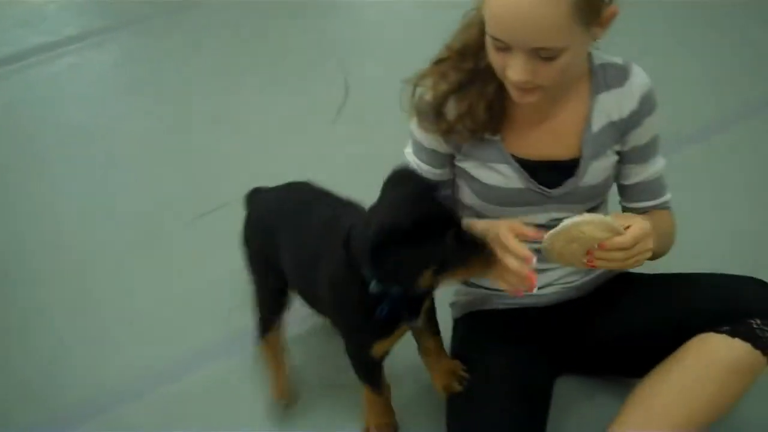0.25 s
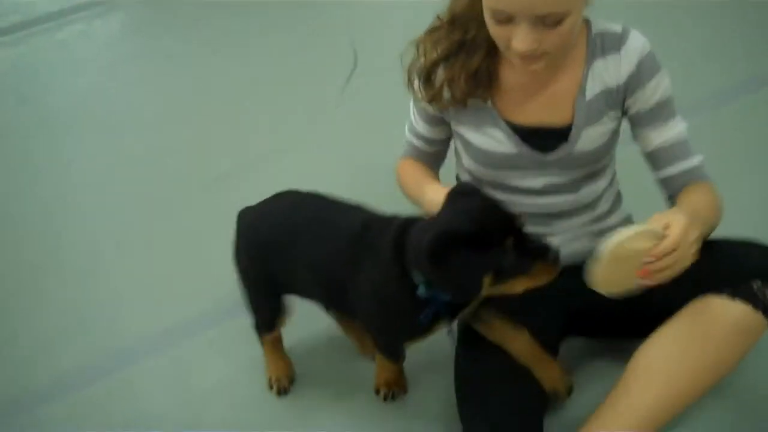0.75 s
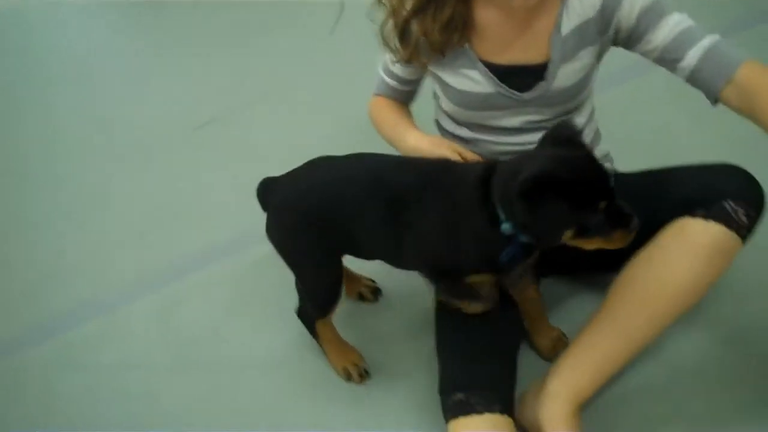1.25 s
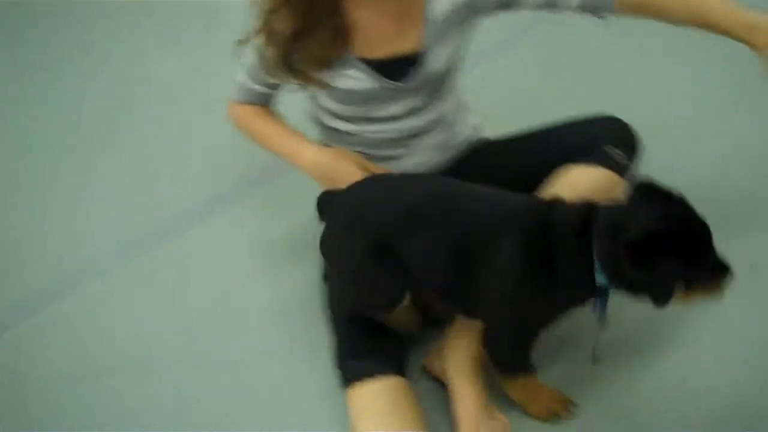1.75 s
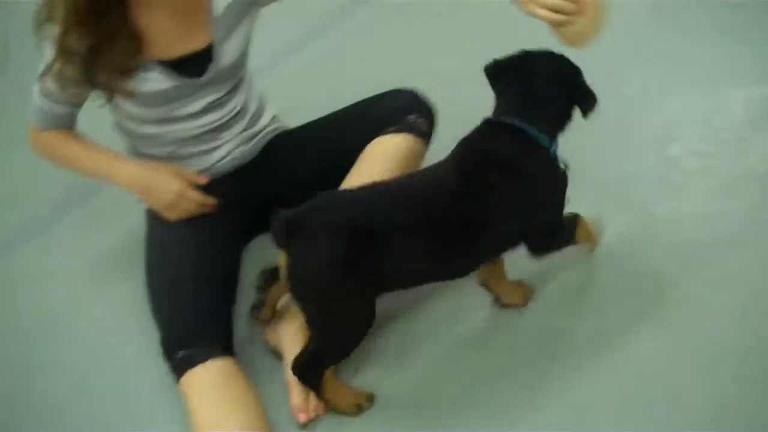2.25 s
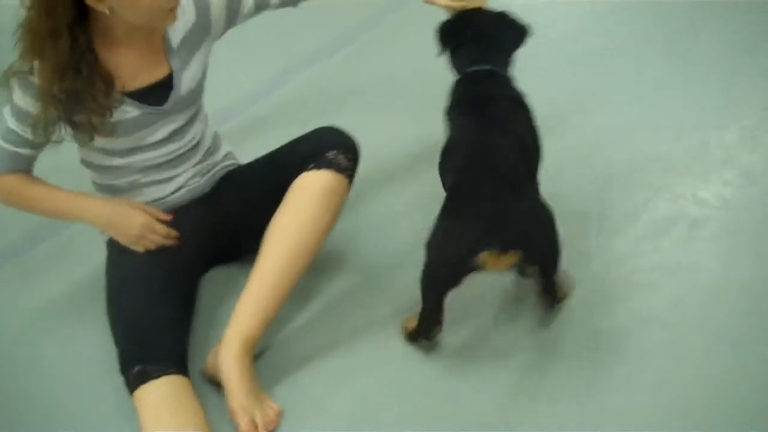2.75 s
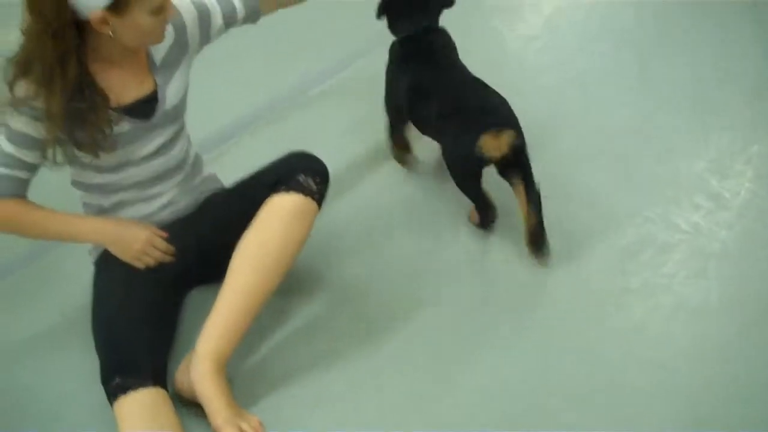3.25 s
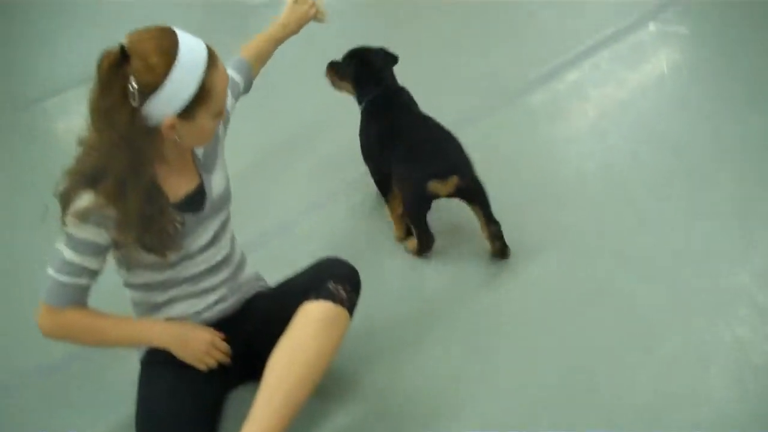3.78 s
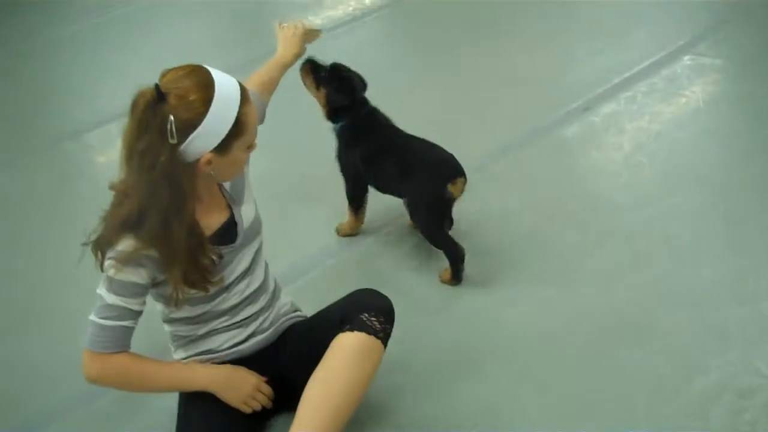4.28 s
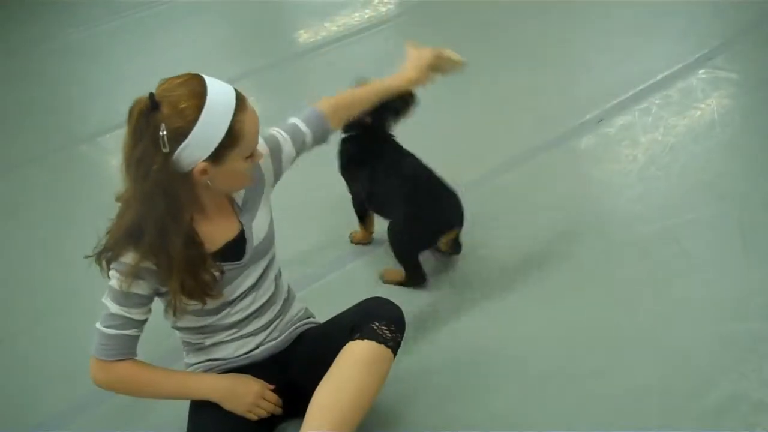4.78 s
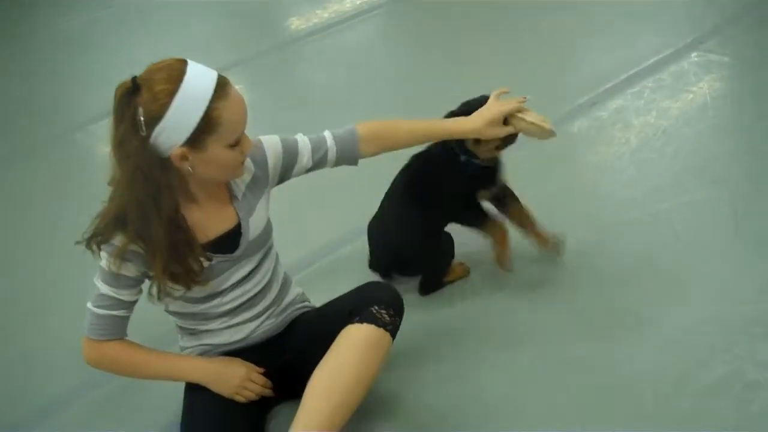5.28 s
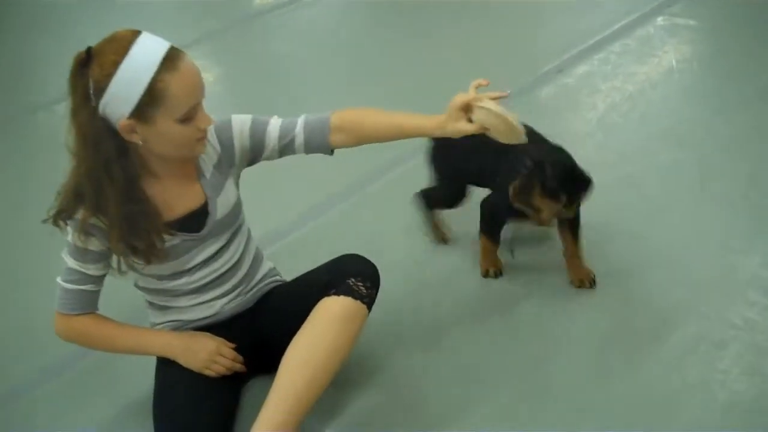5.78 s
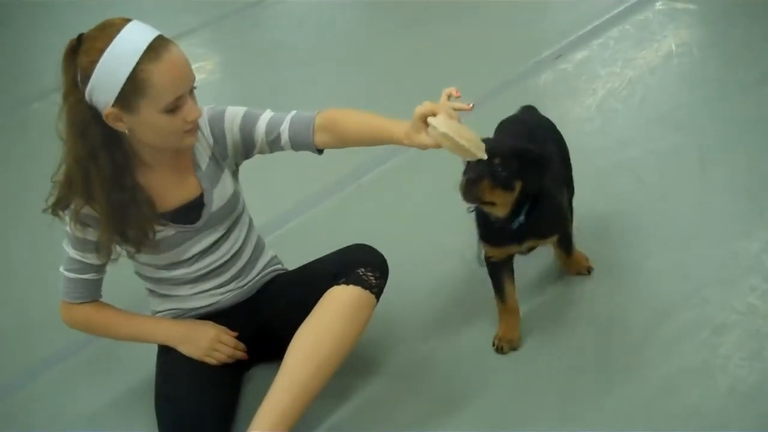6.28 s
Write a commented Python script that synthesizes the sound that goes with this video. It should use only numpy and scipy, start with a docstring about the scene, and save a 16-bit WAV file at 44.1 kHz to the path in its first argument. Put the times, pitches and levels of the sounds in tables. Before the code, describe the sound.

A rubber toy squeaks loudly and close by in a bare, echoing room, over a faint steady rumble and hiss. From about 0.2 to 0.8 seconds come four quick, shrill squeaks, alternating between a lower note on the squeeze and a higher one as the toy refills. From about 1 to 4 seconds a puppy pads around on the smooth floor, with faint claw ticks, soft paw thumps and light brushing of limbs and cloth. Three more squeaks, a little raspier, sound between 1.8 and 2.4 seconds. A last run of five short squeaks lasts from about 4.4 to 5.3 seconds, each leaving a brief echo. The quiet steps return at 5.5 seconds and go on until about 6.5 seconds. At around 5.9 seconds something small and hard gives one sharp click.

```python
"""A rubber toy squeaks in three quick bursts, over the faint rumble and hiss of a bare, echoing room.
One reed (a thin flap shaken by air) sounds as the toy is squeezed, a higher one as it refills.
A puppy pads about on the smooth floor: claws tick, paws thump, limbs and cloth brush along.
Near the end, something small and hard gives one sharp click."""
import sys
import numpy as np
from scipy import signal
from scipy.fft import rfft, irfft
from scipy.io import wavfile

SR = 44100
rng = np.random.default_rng(int(sys.argv[2]) if len(sys.argv) > 2 else 0)


def inscribe(sig):
    """Save sig as 16-bit PCM at rate SR to the path in sys.argv[1].

    A 1-D sig is mono; a 2-D sig holds one channel per row.
    Samples are clipped to [-1, 1] before scaling.
    """
    pcm = np.round(np.clip(np.atleast_2d(sig).T, -1, 1) * 32767)
    wavfile.write(sys.argv[1], SR, pcm.astype(np.int16))


N = 287973
TIME = np.arange(N) / SR

# tone color of the background noise: (frequency [Hz], relative level [dB])
AIR_COLOR = [(18, -57), (30, -17), (110, -1.5), (227, -8), (362, -5.5), (445, -13), (481, -10), (640, -13),
             (729, -13), (1360, -14), (1630, -15.5), (5960, -19), (8140, -15.5), (13700, -26.5),
             (14800, -48)]
# how alike that noise is left and right: (frequency [Hz], likeness [-1 to 1])
AIR_LIKENESS = [(60, 1), (130, 1), (290, 0.89), (630, 0.46), (1370, 0.59), (3000, 0.13), (6550, -0.35),
                (14300, -0.19)]
# faint steady whines: (pitch [Hz], width [Hz], level [dB])
WHINE_TONES = [(210, 19, -70), (723, 2.5, -72), (853, 3.8, -74.5), (7850, 190, -69)]
# how long the echo takes to fade by 60 dB: (frequency [Hz], time [s])
ROOM_FADE = [(100, .6), (1400, 0.93), (3000, 0.7), (6000, 0.97), (9000, 0.71), (14000, 0.23)]
# echo strength against the sound sent to the walls: (frequency [Hz], level [dB])
ROOM_LEVELS = [(100, -17.5), (900, -2.5), (1400, -9), (3000, -8), (6000, -12), (9000, -15.5), (11000, -8.5),
               (14000, -6.5)]
# limbs and cloth sliding: (middle time [s], half length [s], level [dB], center frequency [Hz])
SLIDES = [(0.097, 0.11, -57, 6500), (1.111, 0.12, -50.5, 6000), (1.271, 0.06, -51, 5000),
          (1.377, 0.078, -45.5, 6340), (1.448, 0.097, -49.5, 3260), (1.688, .15, -49, 6000),
          (2.601, .09, -54, 5270), (2.834, .071, -45, 5550), (3.847, 0.19, -58, 5000),
          (5.996, 0.11, -47.5, 6500)]
# paws and heels landing: (time [s], level [dB], treble limit [Hz])
LANDINGS = [(1.086, -44, 393), (1.731, -40.5, 710), (1.752, -48, 137.8), (1.884, -35, 490),
            (1.949, -45, 280), (2.187, -44.5, 280), (2.493, -45, 700), (2.637, -45.5, 593),
            (3.661, -53, 200), (3.889, -46.5, 510), (5.494, -44.5, 603), (5.52, -49.5, 184),
            (5.932, -44.5, 152)]
# claws and small knocks: (time [s], level [dB], ring pitch [Hz])
CLAW_TICKS = [(1.2565, -30.5, 2305), (1.36, -32.5, 6140), (1.732, -29.5, 2700), (1.7749, -21.5, 4200),
              (2.247, -26, 6160), (2.5509, -26, 7000), (2.773, -28.5, 2530), (2.7968, -28, 6200),
              (2.842, -32, 4800), (2.8527, -29, 6700), (3.014, -31, 6700), (3.937, -30.5, 1650),
              (5.493, -36.5, 4000), (5.541, -28, 7100), (5.778, -38, 7000)]
# when the puppy pads about lightly: (start [s], end [s])
WALKS = [(1.1, 4.0), (5.5, 6.5)]
# the sharp click and its bounces: (time [s], relative level [dB])
CLICK_HITS = [(5.9315, -4), (5.9333, -7), (5.946, -19)]
# how the clicking thing rings: (pitch [Hz], width [Hz], relative level [dB])
CLICK_RINGS = [(1120, 200, -8), (3530, 2800, -16), (6720, 1500, 2), (8400, 1700, -21)]
# pops in the first squeak: (time [s], relative thud level [dB], relative crackle level [dB])
POPS = [(0.2105, -31, -24), (0.2140, -35.5, -21)]
# tone color of the reed that sounds on squeezing: (frequency [Hz], relative level [dB])
SQUEEZE_COLOR = [(1200, -16.5), (2400, -16), (3600, -16.5), (4800, -19), (6000, -13), (7200, -5.5),
                 (8400, -3), (9500, -8.5), (10700, -28), (12000, -27.5), (14000, -49)]
# tone color of the reed that sounds on refilling: (frequency [Hz], relative level [dB])
REFILL_COLOR = [(1450, -24.5), (2950, -26.5), (4400, -26.5), (5900, -32), (7400, -18), (8800, -2),
                (10300, -17), (11800, -29.5), (13500, -48)]
# the toy beams its treble past the right microphone: (frequency [Hz], change on the right [dB])
RIGHT_SHADE = [(1200, 3), (4400, 1.5), (6100, 8), (7400, -4), (8500, -13.5), (9600, -11), (11500, -13.5),
               (13000, -26.5)]
# more sound reaches the walls as the toy is held further out: (time [s], boost [dB])
WALL_BOOST = [(.2, -2), (.65, 4.5), (2, 3), (4.45, 9), (4.8, 4.5), (5.2, 3)]
# one row per squeak: (time [s], length [s], top pitch [Hz], share spent rising [0 to 1], level [dB],
# low harmonics boost [dB], swell [dB], treble tilt [dB per octave], hoarseness [dB])
TOY_SQUEAKS = [(0.182, 0.12, 1295, 0.47, -10.5, -5.5, -1.5, 1, -24),
               (0.352, 0.12, 1507, 0.75, -9.5, -3.5, 11.5, -4.5, -9),
               (0.509, 0.067, 1216, 0.3, -11.5, -6.5, 2.5, 4.5, -6),
               (0.639, 0.14, 1477, 0.37, -13, 5, -3.5, 7.5, -3),
               (1.793, 0.098, 1201, .23, -11.5, -9, 0, 3.5, 11),
               (1.972, .123, 1494, 0.45, -9, 2.5, -1, -1.5, 3.5),
               (2.295, 0.063, 1440, 0.27, -8.5, -5, 2, -2.5, 7),
               (4.446, 0.097, 1199, 0.43, -17, -8.5, 7, 0, 3.5),
               (4.623, .093, 1483, 0.42, -11.5, -0.5, 5.5, 0, -1.5),
               (4.765, 0.052, 1187, 0.2, -12.5, -10, 6.5, 7, 11),
               (4.908, 0.072, 1477, 0.4, -11, 1, -2, 2.5, -13),
               (5.184, 0.077, 1453, 0.18, -11, 0, 0, 2, -4)]
# where each reed starts to sound and gives out: (start pitch [Hz], end pitch [Hz])
SQUEEZE_PITCHES = (1174, 1080)
REFILL_PITCHES = (1446, 1270)


def from_db(db):
    """Turn decibels into a number to multiply by."""
    return 10 ** (np.asarray(db) / 20)


def rms_one(x):
    """Scale a sound to an average power of 1."""
    return x / np.sqrt(np.mean(x ** 2) + 1e-20)


def at_hz(points, hz):
    """Read between a table's rows, with octaves evenly spaced."""
    return np.interp(np.log(np.maximum(hz, 1)), *np.transpose([(np.log(f), v) for f, v in points]))


def add(out, s, sound):
    """Mix a sound in, starting at s seconds."""
    at = int(s * SR)
    out[..., at:at + sound.shape[-1]] += sound[..., :N - at]


def panned(x, pan_db):
    """Make the left side pan_db louder than the right."""
    return x * from_db([[pan_db / 2], [-pan_db / 2]])


def lowpass(x, hz, order=2):
    """Soften everything above hz."""
    return signal.sosfilt(signal.butter(order, min(hz, SR / 2 - 100), fs=SR, output="sos"), x)


def resonance(x, hz, width_hz):
    """Let a sound ring around hz; a narrower band rings longer."""
    r = np.exp(-np.pi * width_hz / SR)
    feedback = [1, -2 * r * np.cos(2 * np.pi * hz / SR), r * r]
    return signal.lfilter(np.array([1, 0, -1]) * (1 - r * r) / 2, feedback, x)


def wobble(size, hz):
    """Random wavering, up to about hz times a second."""
    return rms_one(lowpass(rng.standard_normal(2 * size), hz)[size:])


def burst(fade_s, size):
    """Noise that fades by 60 dB in fade_s seconds."""
    return rng.standard_normal(size) * from_db(-60 * TIME[:size] / fade_s)


def paired_noise(size, alike):
    """Left and right noise spectra, with a chosen likeness at each frequency."""
    mid, side = rfft(rng.standard_normal((2, size)))
    return np.sqrt((1 + alike) / 2) * mid + np.sqrt((1 - alike) / 2) * side * [[1], [-1]]


def narrow_tone(hz, width_hz):
    """Noise narrowed down to a wavering tone."""
    return rms_one(resonance(resonance(rng.standard_normal(N + SR), hz, width_hz), hz, width_hz)[SR:])


def air(level_db=-56):
    """Ventilation rumbles, much alike on both sides, under hiss and a few whines."""
    hz = np.arange(N // 2 + 1) * SR / N
    alike = np.clip(at_hz(AIR_LIKENESS, hz), -.88, .88)
    noise = irfft(paired_noise(N, alike) * from_db(at_hz(AIR_COLOR, hz)), N)
    whines = sum(from_db(db) * narrow_tone(pitch, width) for pitch, width, db in WHINE_TONES)
    return from_db(level_db) * rms_one(noise) + whines


def drone(start_s=1.42, rise_s=0.019, fade_s=0.64, level_db=-50.5):
    """A faint low tone swells and dies away."""
    t = np.maximum(TIME - start_s, 0)
    loudness = np.minimum(t / rise_s, 1) * from_db(level_db - 60 * t / fade_s)
    return loudness * narrow_tone(hz=288, width_hz=18)


def room(x, first_echo_s=0.0024, build_s=0.0053, mic_gap_m=0.043):
    """Wall echoes build up after a short gap; each frequency band fades at its own speed."""
    t, hz = TIME[:SR], np.arange(SR // 2 + 1)
    # long waves reach both microphones alike
    noise = paired_noise(SR, np.sinc(2 * hz * mic_gap_m / 343))
    build_up = np.clip((t - first_echo_s) / build_s, 0, 1)
    edges = np.r_[0, np.geomspace(200, 16000, 14)]
    echo = np.zeros((2, SR))
    for low, high in zip(edges, edges[1:]):
        center = (low + high) / 2
        fade = build_up * from_db(-60 * t / at_hz(ROOM_FADE, center))
        band = irfft(noise * ((hz >= low) & (hz < high)), SR)
        echo += band * fade / np.sqrt(np.sum(fade ** 2)) * from_db(at_hz(ROOM_LEVELS, center))
    return signal.fftconvolve(x, echo, axes=1)[:, :N]


def light_steps(steps_per_s=3.5, spread_db=3):
    """The puppy's uneven steps: (time [s], level against a usual step [dB])."""
    chance = rng.uniform(-1, 1, (64, 2))
    steps = [((k + shift / 2) / steps_per_s, spread_db * weight)
             for k, (shift, weight) in enumerate(chance)]
    return [(s, db) for s, db in steps if any(start < s < end for start, end in WALKS)]


def brushes(steps, step_s=0.042, step_db=-57.5, step_hz=5600, grain_db=3.0):
    """Limbs and cloth rub the floor in swells of grainy noise."""
    out = np.zeros((2, N))
    for s, half_s, db, hz in SLIDES + [(s, step_s, step_db + db, step_hz) for s, db in steps]:
        size = min(int(2 * half_s * SR), SR // 2)
        rubbing = rng.standard_normal((2, SR // 2)) * from_db(grain_db * wobble(SR // 2, hz=150))
        rubbing = lowpass(resonance(rubbing[:, :size], hz, width_hz=hz), 8100, order=4)
        add(out, max(s - half_s, 0), from_db(db) * rms_one(rubbing) * np.hanning(size))
    return out


def thumps(steps, step_db=-52.5, step_hz=220, fade_cycles=41.4, rise_s=0.002, lowest_hz=78):
    """Soft weight lands on the floor: a dull push with a hollow knock in it."""
    out, t = np.zeros(N), TIME[:SR // 3]
    for s, db, hz in LANDINGS + [(s, step_db + db, step_hz) for s, db in steps]:
        fade_s = fade_cycles / hz  # a softer landing is duller and lasts longer
        add(out, s, wobble(len(t), hz) * from_db(db - 60 * t / fade_s) * np.minimum(t / rise_s, 1))
    knock = from_db(-8) * resonance(out, hz=440, width_hz=160)
    bass_cut = signal.butter(4, lowest_hz, "high", fs=SR, output="sos")
    return panned(signal.sosfilt(bass_cut, out + knock), pan_db=0)


def ticks(steps, step_db=-41, step_hz=5500):
    """A hard claw tip meets the floor: a crack with one short ring."""
    out = np.zeros(N)
    for s, db, hz in CLAW_TICKS + [(s, step_db + db, step_hz) for s, db in steps]:
        contact = burst(fade_s=0.011, size=2000)
        ring = resonance(contact, hz, width_hz=1500)
        crack = from_db(-6.5) * resonance(contact, hz=2690, width_hz=4200)
        tick = lowpass(ring + crack, 8200, order=4)
        add(out, s, tick / np.abs(tick).max() * from_db(db))
    return panned(out, pan_db=0.2)


def sharp_click(trim_db=-0.5):
    """Something small and hard hits, rings briefly and bounces."""
    hits = np.zeros(N)
    for s, db in CLICK_HITS:
        add(hits, s, from_db(db + trim_db) * burst(fade_s=0.0045, size=1000))
    ringing = sum(from_db(db) * resonance(hits, hz, width) for hz, width, db in CLICK_RINGS)
    return panned(lowpass(ringing, 10100, order=4), pan_db=1)


def pop(thud_s=0.0022):
    """A brief low pop with a crackle, mostly on the left, as the first squeak overloads the microphone."""
    out = np.zeros(N)
    thud = np.sin(np.pi * np.minimum(TIME[:1000] / thud_s, 1))
    for s, thud_db, crackle_db in POPS:
        add(out, s, from_db(crackle_db) * burst(fade_s=0.012, size=1000) - from_db(thud_db) * thud)
    return panned(out, pan_db=12)


def near_echoes(sound, count=4, level_db=-22):
    """The floor and nearby bodies bounce a squeak back within milliseconds."""
    out = np.zeros((2, SR // 5))
    for delay_s in rng.uniform(.003, .016, count):
        add(out, delay_s, sound * from_db(level_db))
    return out


def reed_breath(phase, progress, hoarse):
    """Air spits as the reed comes unstuck, then rushes and leaks more and more as it loses its grip."""
    size = len(phase)
    rush = resonance(rng.standard_normal((2, SR // 5)), hz=8500, width_hz=2900)
    rush = resonance(rush, hz=8500, width_hz=2900)
    rush = rms_one(lowpass(rush, 7800, order=6))[:, :size]
    opening = 1 + np.cos(phase) / 2  # more air passes each time the reed opens
    rasp = panned(rush, pan_db=10) * opening * from_db(-28) * progress ** 2
    leak = resonance(rng.standard_normal(SR // 5), hz=7500, width_hz=3300)
    leak = rms_one(lowpass(leak, 11000, order=4))[:size] * from_db(-35) * progress
    spit = from_db(-20.5) * lowpass(burst(fade_s=0.028, size=SR // 5), 10000)[:size]
    return hoarse * (rasp + leak) + spit


def reed_tone(color, pitch, phase, low_db, tilt_db, waver_db=1.6, right_lag_s=-0.000026):
    """The shaking reed makes 12 harmonics: tones at whole multiples of its pitch."""
    tone = np.zeros((2, len(pitch)))
    for k in range(1, 13):
        hz = k * pitch
        low_share = 1 / (1 + (hz / 4500) ** 4)
        color_db = at_hz(color, hz) + low_db * low_share + tilt_db * (1 - low_share) * np.log2(hz / 8000)
        angle = k * phase - np.pi * (k / 4) ** 2
        # the toy is a little nearer the right microphone, and wavers as it moves in the hand
        for side, (shade_db, lag_s) in enumerate([(0, 0), (at_hz(RIGHT_SHADE, hz), right_lag_s)]):
            hand_db = waver_db * wobble(SR // 5, hz=25)[:len(pitch)]
            strength = np.sqrt(2) * from_db(color_db + shade_db + hand_db)
            tone[side] += strength * np.cos(angle - 2 * np.pi * hz * lag_s)
    return tone


def squeak(color, start_hz, end_hz, length, top_hz, rise_share, level_db, low_db, swell_db, tilt_db,
           hoarse_db, chirp_hz=59, chirp_s=0.0013, on_s=0.0016, off_s=0.0023, edge_db=1.5, choke_db=-12):
    """The reed's pitch follows the air pressure: it climbs, holds, then sags as the air runs out."""
    t, hoarse = TIME[:int(length * SR)], from_db(hoarse_db)
    progress, size = t / length, len(t)
    climb_left = np.clip(1 - progress / rise_share, 0, 1)
    sag = np.clip((progress - rise_share) / (1 - rise_share), 0, 1) ** 1.9
    pitch = top_hz - (top_hz - start_hz) * climb_left ** 2 - (top_hz - end_hz) * (sag + sag ** 3) / 2
    pitch -= chirp_hz * np.exp(-t / chirp_s)  # the reed chirps up as it comes unstuck
    out_of_air = progress ** 5
    # pitch and level grow shaky as the reed loses its grip
    jitter = (0.001 + 0.0059 * hoarse * out_of_air) * wobble(SR // 5, hz=900)[:size]
    phase = 2 * np.pi * np.cumsum(pitch * (1 + jitter)) / SR
    tone = reed_tone(color, pitch, phase, low_db, tilt_db)
    flutter = 1 + 0.11 * hoarse * progress ** 2 * wobble(SR // 5, hz=500)[:size]
    sound = tone * flutter + reed_breath(phase, progress, hoarse)
    on_off = (1 - np.exp(-t / on_s)) * np.clip((length - t) / off_s, 0, 1)
    edges = (2 * progress - 1) ** 2  # the reed is weaker midway, where it is pressed hardest
    loudness_db = level_db + swell_db * (progress - .5) + edge_db * edges + choke_db * out_of_air
    return panned(sound, pan_db=1.34) * on_off * from_db(loudness_db)


def toy(refill_from_hz=1370):
    """Squeezing sounds the low reed, refilling the high one; gives (near sound, sound for the walls)."""
    near, to_walls = np.zeros((2, 2, N))
    for s, length, top_hz, *shape in TOY_SQUEAKS:
        squeezing = top_hz < refill_from_hz
        color, pitches = (SQUEEZE_COLOR, SQUEEZE_PITCHES) if squeezing else (REFILL_COLOR, REFILL_PITCHES)
        sound = squeak(color, *pitches, length, top_hz, *shape)
        add(near, s, sound)
        add(near, s, near_echoes(sound))
        add(to_walls, s, sound * from_db(np.interp(s, *np.transpose(WALL_BOOST))))
    return near, to_walls


def scene(floor_echo_db=4.5, click_echo_db=2.0):
    """Toy, puppy and click share one echoing room over its steady noise."""
    squeaks, to_walls = toy()
    click, steps = sharp_click(), light_steps()
    floor = ticks(steps) + thumps(steps) + brushes(steps) + drone()
    echoes = room(to_walls + from_db(floor_echo_db) * floor + from_db(click_echo_db) * click)
    return squeaks + click + floor + pop() + echoes + air()


def record(dry, peak_limit=0.88, cutoff_hz=14300):
    """Clip any peaks over the limit, then cut the highest treble."""
    treble_cut = signal.ellip(12, .1, 90, cutoff_hz, fs=SR, output="sos")
    return signal.sosfilt(treble_cut, np.clip(dry, -peak_limit, peak_limit))


dry = scene()
out = record(dry)
inscribe(out)
```